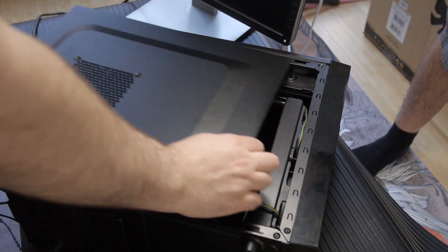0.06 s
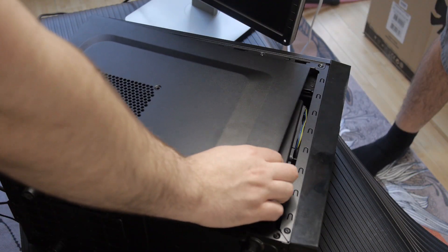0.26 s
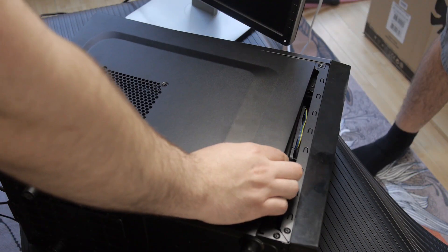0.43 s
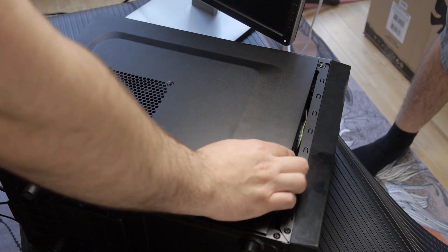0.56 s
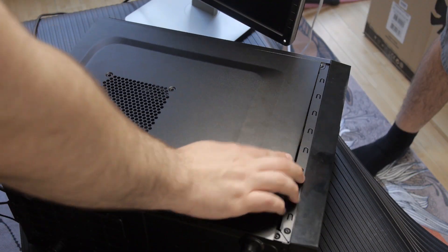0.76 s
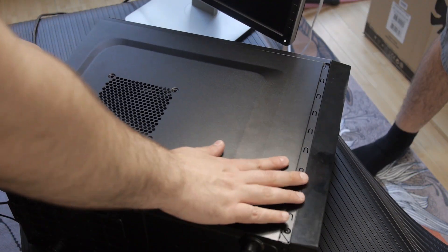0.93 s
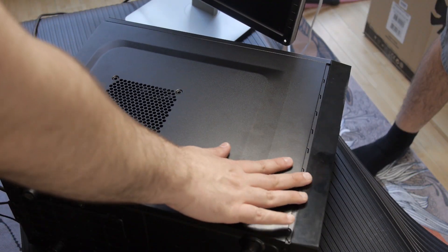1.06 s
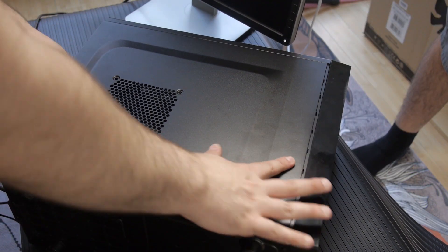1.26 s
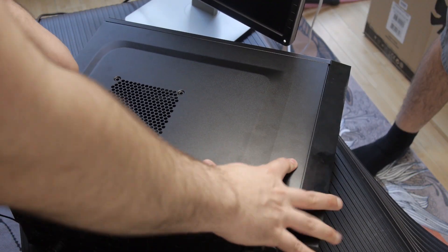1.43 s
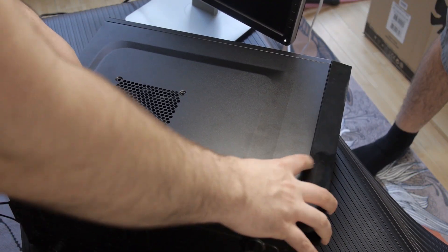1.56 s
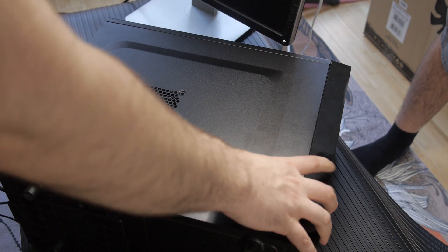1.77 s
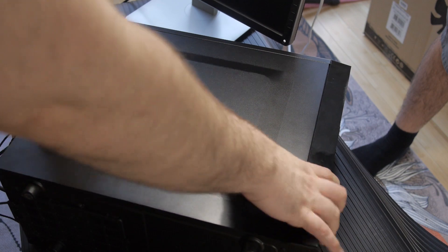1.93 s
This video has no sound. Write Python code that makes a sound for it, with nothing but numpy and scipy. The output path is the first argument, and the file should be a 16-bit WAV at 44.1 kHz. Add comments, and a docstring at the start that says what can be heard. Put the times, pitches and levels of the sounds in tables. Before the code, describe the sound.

A sheet-metal computer case panel slides along its rails and clanks shut, rattling, then light knocks

```python
"""In a small room, a sheet-metal side panel is laid on a computer case, slid along its rails and pushed shut.
Its edge scrapes and ticks on the frame; it drops in with two loud clanks, chatters, then is knocked lightly.
Each knock sums a snap, a gliding flex tone, fixed sheet modes and bands of decaying noise.
Ticks and short rings are noise around one pitch, the slide is random slips filtered into rumble and scrape.
Faint room rumble, hiss and a dying case ring lie beneath; the two channels are nearly equal."""
import sys
import numpy as np
from scipy import signal
from scipy.fft import rfft, irfft
from scipy.io import wavfile
from scipy.ndimage import uniform_filter1d

SR = 44100
rng = np.random.default_rng(int(sys.argv[2]) if len(sys.argv) > 2 else 0)


def wrap_up_sound(samples):
    """Save the sound to the file named by the first command line argument, as 16-bit audio."""
    columns = np.atleast_2d(samples).T
    # keep every value between -1 and 1, then stretch to whole-number steps
    tamed = np.clip(columns, -1, 1)
    steps = np.round(tamed * 32767).astype(np.int16)
    wavfile.write(sys.argv[1], SR, steps)


N = 88200


def amp(db):
    """Decibels to gain."""
    return 10 ** (np.asarray(db) / 20)


def evened(x):
    """Scales to rms 1."""
    return x / np.sqrt(np.mean(x ** 2) + 1e-20)


def read(points, hz):
    """Reads (Hz, value) points on a log-frequency axis."""
    point_hz, value = np.transpose(points)
    return np.interp(np.log(hz + 1), np.log(point_hz + 1), value)


def fade(t, t60_s):
    """Exponential decay, 60 dB in t60_s (1 ms at least)."""
    return np.exp(-np.log(1000) * t / max(t60_s, 1e-3))


def filtered(x, points):
    """Applies (Hz, dB) points as a filter, without phase shift."""
    hz = np.fft.rfftfreq(len(x), 1 / SR)
    return irfft(rfft(x) * amp(read(points, hz)), len(x))


def coloured(x, points):
    """Filters x by (Hz, dB) points and scales it to rms 1."""
    return evened(filtered(x, points))


def add(mix, start_s, sound):
    """Mixes a sound in at start_s, cut off at the end of the mix."""
    part = mix[max(round(start_s * SR), 0):][:len(sound)]
    part += sound[:len(part)]


# Blows of the panel and the hand. Each row: start in seconds, flex pitch in Hz, levels in dB of
# flex, body, clang, clatter, edge and sparkle, ring length as a factor.
BLOWS = [(0.1989, 390, -11, -27.5, -18.5, -28, -20.5, -28, 0.73),
         (0.2118, 345, -10.5, -27, -19, -46, -42, -46, 0.9),
         (0.2559, 348, -21.5, -23, -21.5, -26.5, -32, -50, 2.1),
         (0.2984, 311, -17, -22, -11, -14.5, -7.5, -14, 0.85),
         (0.314, 339, -18.5, -22.5, -17, -21, -16, -10, 1.24),
         (0.327, 270.6, -13, -22, -19, -26, -35, -11, 1.51),
         (0.408, 334, -12, -24.5, -35, -54, -37, -42, 0.92),
         (0.4452, 365, -22, -35.5, -29.5, -20, -47, -52, 1.1),
         (0.578, 267.5, -19.5, -30, -32.5, -31.5, -45, -44, 1.8),
         (0.619, 371.7, -8, -29, -23, -24, -25.5, -34.5, 0.85),
         (0.6272, 346.8, -9.5, -23.5, -15.5, -20, -42.5, -37, 1.08),
         (0.7082, 353, -28, -29, -17.5, -21.5, -21, -49, 0.59),
         (0.8393, 387, -15, -28, -8, -7.5, -3.5, -8, 0.68),
         (0.8455, 256.4, -6.5, -9.5, -4, -16.5, -29, -28, 1.04),
         (0.8506, 573.6, -12, -26, -8.5, -17.5, -12, -19, 1.2),
         (0.864, 318, -6, -22, -20.5, -29.5, -25, -32, 1.05),
         (0.902, 304, -7.5, -18, -36.5, -36.5, -20, -43, 0.56),
         (1.021, 361, -20, -29, -20.5, -34.5, -27, -46.5, 1.4),
         (1.0318, 354, -5.5, -23, -10.5, -21.5, -47, -55, 0.43),
         (1.0396, 263, 4.5, -19, -5.5, -2.5, -0.5, -0.5, 0.35),
         (1.0413, 152.7, -8, -8.5, -1.5, -0.5, 0, 3, 0.98),
         (1.047, 384, -1.5, -18, -4, -15, -19, -19, 1.01), (1.064, 263, -6, -19, -19, -19, -31, -42, 0.91),
         (1.083, 281, -17, -11, -20.5, -20, -39, -39, 1.05),
         (1.102, 320, -5, -22, -32, -50, -46, -50, 0.62), (1.371, 271, -37, -34.5, -33, -45, -35, -52, 1.2),
         (1.386, 222, -30.5, -32, -41, -46, -33, -52, 1.2),
         (1.538, 239, -11.5, -20, -19, -36.5, -21.5, -45, 1.05),
         (1.5632, 331, -20.5, -25.5, -18.5, -43, -42, -55, 0.76),
         (1.609, 275, -22.5, -40, -32.5, -43, -35, -37, 1.28),
         (1.748, 278, -29, -32.5, -32.5, -51, -52.5, -61, 0.65),
         (1.929, 250, -31.5, -43, -50, -38, -35, -47, 0.73),
         (1.9819, 251, -17, -25, -26.5, -26, -32, -44, 1.4),
         (1.988, 570, -24.5, -21, -22, -31.5, -27, -48, 0.78)]


def knocks(mix):
    """Every blow excites the same sheet, each with its own colour and ring length."""
    for start_s, *blow in BLOWS:
        add(mix, start_s, knock(*blow))


# Pitches in Hz where a blow's colour is set: deep bass, body, clang, clatter, edge, sparkle.
COLOUR_POINTS_HZ = [110, 300, 950, 2700, 7000, 13000]
FLEX_DB, FLEX_RISE_S, FLEX_T60_S = -13, 0.002, 0.12  # level and t60 before the blow's own
FLEX_SHARP_SHARE, FLEX_RELAX_S = 0.093, 0.012  # the bent sheet starts sharp and sinks to its pitch
SNAP_DB, SNAP_S = -19, 0.00008  # level before the blow's sparkle
BOOM_LOSS = 0.18  # dB of deep bass lost per dB that the clang is lighter


def knock(flex_hz, flex_db, body_db, clang_db, clatter_db, edge_db, sparkle_db, ring_factor, size=32768):
    """A blow snaps, flexes the sheet and rings its clear modes and its crowded resonances."""
    t = np.arange(size) / SR
    boom_db = body_db + BOOM_LOSS * clang_db
    colour = np.c_[COLOUR_POINTS_HZ, [boom_db, body_db, clang_db, clatter_db, edge_db, sparkle_db]]
    snap = amp(SNAP_DB + sparkle_db) * (1 - t / SNAP_S) * np.exp(-t / SNAP_S)
    flex_rise = 1 - np.exp(-t / FLEX_RISE_S)
    flex_level = amp(FLEX_DB + flex_db) * flex_rise * fade(t, FLEX_T60_S * ring_factor)
    extra_s = FLEX_SHARP_SHARE * FLEX_RELAX_S * (1 - np.exp(-t / FLEX_RELAX_S))  # integral of the glide
    flex = flex_level * np.sin(2 * np.pi * flex_hz * (t + extra_s))
    return snap + flex + crowded_ring(t, colour, ring_factor) + clear_modes(t, colour, ring_factor)


# Clear modes of the panel. Each row: pitch in Hz, level in dB, t60 in seconds,
# before the blow's colour, ring factor and grip.
PANEL_MODES = [(103.5, -26, 0.37), (156.7, -27.5, 0.51), (211.4, -27.5, 0.22), (266.3, -21, 0.27),
               (318, -25.5, 0.43), (377.3, -24.5, 0.41), (633.4, -28.5, 0.21), (697.4, -28.5, 0.15),
               (1070, -28.5, 0.18), (1196, -33, 0.054), (1348, -42.5, 0.095), (1510, -30, 0.16),
               (1870, -32, 0.21), (2086, -32, 0.22), (2138, -32, 0.15), (3240, -44, 0.13),
               (3340, -33.5, 0.12), (3460, -34, 0.17)]
MODE_SCATTER_DB, MODE_DETUNE_SHARE = 1.5, 0.0044  # standard deviations: the grip varies from blow to blow


def clear_modes(t, colour, ring_factor):
    """The sheet's distinct modes: decaying sines, with level and pitch shifted by the hand's grip."""
    out = np.zeros(len(t))
    for hz, db, t60_s in PANEL_MODES:
        level_luck, pitch_luck = rng.standard_normal(2)
        mode_hz = hz * (1 + MODE_DETUNE_SHARE * pitch_luck)
        tone = np.sin(2 * np.pi * (mode_hz * t + rng.random()))
        rise = 1 - np.exp(-t * hz)
        level = amp(db + read(colour, hz) + MODE_SCATTER_DB * level_luck)
        out += level * tone * rise * fade(t, t60_s * ring_factor)
    return out


# Crowded resonances of sheet and case. Each row: centre in Hz, ring in dB, first crack in dB,
# ring t60 in seconds before the blow's ring factor, room tail in dB, tail t60 in seconds.
RING_BANDS = [(48.5, -47.5, -57, 0.16, -65, 0.9), (131, -25, -27, 0.19, -46, 0.63),
              (250, -30, -13.5, 0.18, -44.5, 1), (390, -24.5, -10, 0.22, -37, 0.66),
              (567, -29.5, -72, 0.29, -51, 0.93), (1120, -26, -51, 0.16, -43, 0.63),
              (2000, -26, -23, 0.12, -42.5, 0.64), (3540, -32, -39, 0.2, -47.5, 0.75),
              (4450, -40, -39.5, 0.22, -55, 0.78), (5200, -39, -39.5, 0.15, -57.5, 0.79),
              (8330, -40.5, -34, 0.11, -56.5, 0.41), (13400, -50.5, -36, 0.078, -67, .35)]
CRACK_T60_S = 0.03  # up to 3 kHz
CRACK_SHORTENING = 0.25  # power by which the crack shortens with pitch above 3 kHz


def crowded_ring(t, colour, ring_factor):
    """Countless close resonances as noise bands: a crack, a quick ring and the room's tail."""
    hz = np.fft.rfftfreq(len(t), 1 / SR)
    noise = rfft(rng.standard_normal(len(t)))
    centres_hz = np.array(RING_BANDS)[:, 0]
    out = np.zeros(len(t))
    for share, row in zip(np.eye(len(RING_BANDS)), RING_BANDS):
        centre_hz, ring_db, crack_db, ring_t60_s, tail_db, tail_t60_s = row
        band = irfft(noise * read(np.c_[centres_hz, share], hz))  # crossfades with its neighbours
        window = max(round(6 * SR / centre_hz), 1024)
        band /= np.sqrt(uniform_filter1d(band ** 2, size=window) + 1e-20)  # flattens slow swells
        crack_t60_s = CRACK_T60_S * min(3000 / centre_hz, 1) ** CRACK_SHORTENING
        ring = amp(ring_db) * fade(t, ring_t60_s * ring_factor)
        crack = amp(crack_db) * fade(t, crack_t60_s)
        tail = amp(tail_db) * fade(t, tail_t60_s)
        power = ring ** 2 + crack ** 2 + tail ** 2 * abs(ring_factor)
        # the envelope, scaled so that the band's energy equals that of the power curve
        band *= np.sqrt(power * power.sum() / (power * band ** 2).sum())
        out += amp(read(colour, centre_hz)) * band * (1 - np.exp(-2 * t * centre_hz))
    return out


# Ticks, and short rings that colour some blows. Each row: start in seconds, level in dB,
# centre in Hz, width in octaves, t60 in seconds.
SHORT_RINGS = [(0.1988, -52.5, 5900, 0.26, 0.08), (0.2, -46.5, 574, 0.44, 0.29),
               (0.2986, -24, 1240, 1.2, 0.014), (0.431, -60, 6600, 0.42, .04),
               (0.5388, -53, 8360, .25, 0.032), (0.7073, -40, 1530, 0.16, 0.029),
               (0.8265, -47.5, 6740, 0.6, 0.099), (0.8383, -30.5, 2090, 0.32, 0.13),
               (0.839, -36.5, 3980, 0.16, 0.048), (1.0406, -25, 3390, 0.32, 0.047),
               (1.042, -27, 1063, 0.034, 0.17), (0.9798, -46.5, 2780, 0.81, .045),
               (1.285, -61, 4080, 1.2, 0.032), (1.531, -45.5, 3340, 0.95, 0.046),
               (1.553, -46, 1440, 0.84, 0.052), (1.585, -54, 2000, 1, 0.076),
               (1.929, -54.5, 1500, 1.2, 0.02), (1.9629, -56, 7440, 0.86, 0.028),
               (1.964, -55, 3540, 0.23, 0.049)]


def short_rings(mix):
    """Ticks, and short rings that colour some blows, at their listed times."""
    for start_s, *ring in SHORT_RINGS:
        add(mix, start_s, short_ring(*ring))


RING_TAIL_DB, RING_TAIL_T60_S = -18, 0.45  # level relative to the short ring


def short_ring(db, centre_hz, octaves, t60_s, size=8192):
    """Narrow or wide noise around one pitch, dying fast, with a weaker long tail."""
    t, hz = np.arange(size) / SR, np.fft.rfftfreq(size, 1 / SR)
    offset = np.log2((hz + 1) / centre_hz) / octaves
    shape = 1 / (1 + offset ** 2) ** 1.83
    noise = evened(irfft(rfft(rng.standard_normal(size)) * shape))
    return amp(db) * noise * (fade(t, t60_s) + amp(RING_TAIL_DB) * fade(t, RING_TAIL_T60_S))


# Course of the sliding. Each row: time in seconds, sheet rumble in dB, edge scrape in dB.
SLIDE_COURSE = [(0, -72, -65), (0.188, -63, -70), (.26, -52, -69), (.36, -45, -52), (.44, -41, -47.5),
                (.49, -46, -51.5), (.55, -40, -49.5), (.605, -47, -47), (0.66, -38, -52), (.70, -49, -56),
                (.76, -43.5, -51.5), (0.819, -39.5, -42.5), (.93, -49, -46), (1.02, -52.5, -51),
                (1.18, -45, -62.5), (1.329, -61, -76), (1.439, -56.5, -63), (1.7, -68, -65.5),
                (1.901, -73, -71), (2, -52.5, -57)]
# Filter of the sheet's rumble. Each row: frequency in Hz, gain in dB before scaling to rms 1.
RUMBLE_COLOUR = [(30, -29), (90, -11.5), (160, -16), (215, -7), (270, -5), (365, -0.5), (450, -14.5),
                 (600, -24), (1500, -57)]
# Filter of the edge's scrape. Each row: frequency in Hz, gain in dB before scaling to rms 1.
SCRAPE_COLOUR = [(200, -6.5), (600, 3.5), (1200, 2), (2300, -6.5), (3700, -11.5), (4800, -19.5),
                 (7500, -31), (10000, -54), (15000, -60.5)]
SLIPS_PER_S, SLIP_SPREAD_DB, SLIP_T60_S = 500, 4.5, 0.18


def slide(size=8192, contacts=6):
    """Tiny slips at several contact points of the rail scrape and set the sheet rumbling."""
    t = np.arange(N) / SR
    when_s, rumble_db, scrape_db = np.transpose(SLIDE_COURSE)
    force = amp(SLIP_SPREAD_DB * np.minimum(rng.exponential(1, N), 3))
    slips = (rng.random(N) < SLIPS_PER_S / SR) * force * rng.choice([-1, 1], N)
    contact = rng.integers(0, contacts, N)
    rings = rng.standard_normal((contacts, size)) * fade(t[:size], SLIP_T60_S)
    rub = np.zeros(N)
    for k, ring in enumerate(rings):
        rub += signal.fftconvolve(slips * (contact == k), ring)[:N]
    rumble = amp(np.interp(t, when_s, rumble_db)) * coloured(rub, RUMBLE_COLOUR)
    scrape = amp(np.interp(t, when_s, scrape_db)) * coloured(rub, SCRAPE_COLOUR)
    return rumble + scrape


# Ring of the case at the opening. Each row: frequency in Hz, gain in dB before scaling to rms 1.
CASE_RING_COLOUR = [(100, -36), (270, 10), (400, -11.5), (1000, -4.5), (2000, -12.5), (3700, -10),
                    (5000, -25), (12000, -41)]
CASE_RING_DB, CASE_RING_T60_S = -56.5, 1.18


def case_ring():
    """The case is still humming out as the scene opens: coloured noise that decays."""
    t = np.arange(N) / SR
    hum = coloured(rng.standard_normal(N), CASE_RING_COLOUR)
    return amp(CASE_RING_DB) * fade(t, CASE_RING_T60_S) * hum


# Room rumble and microphone hiss. Each row: frequency in Hz, density in dB per Hz before scaling to rms 1.
FLOOR_COLOUR = [(20, -9), (48, -7.5), (115, -2.5), (170, -12.5), (300, -11), (650, -27), (2000, -35),
                (6000, -42.5), (15500, -46.5)]
FLOOR_DB = -58.5


def room_floor():
    """Steady room rumble and microphone hiss as coloured noise."""
    return amp(FLOOR_DB) * coloured(rng.standard_normal(N), FLOOR_COLOUR)


def scene():
    """All sources, the same in both channels."""
    mix = room_floor() + case_ring() + slide()
    knocks(mix)
    short_rings(mix)
    return np.array([mix, mix])


# Noise of each channel. Each row: frequency in Hz, density in dB per Hz before scaling to rms 1.
CHANNEL_NOISE_COLOUR = [(25, 25), (120, 10), (400, 2.5), (1000, -7), (5000, 8.5), (15000, 15.5)]
# Slightly lighter bass of the right channel. Each row: frequency in Hz, gain in dB.
RIGHT_GAIN = [(600, -.2), (900, -.03)]
CHANNEL_NOISE_DB, BAND_LIMIT_HZ = -75.5, 15850


def record(dry):
    """Two nearly equal channels, each with a little noise of its own, then the band limit."""
    noise = np.array([coloured(rng.standard_normal(N), CHANNEL_NOISE_COLOUR) for _ in dry])
    both = np.array([dry[0], filtered(dry[1], RIGHT_GAIN)]) + amp(CHANNEL_NOISE_DB) * noise
    lowpass = signal.firwin(511, BAND_LIMIT_HZ, window=("kaiser", 9), fs=SR)
    return signal.oaconvolve(both, lowpass[None], "same")


dry = scene()
out = record(dry)
wrap_up_sound(out)
```